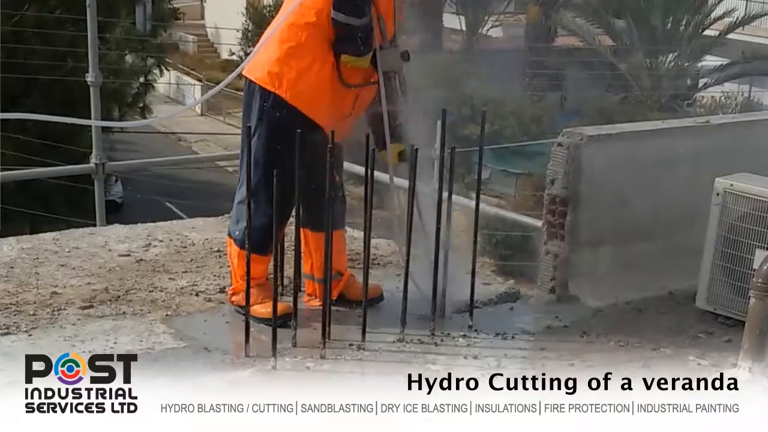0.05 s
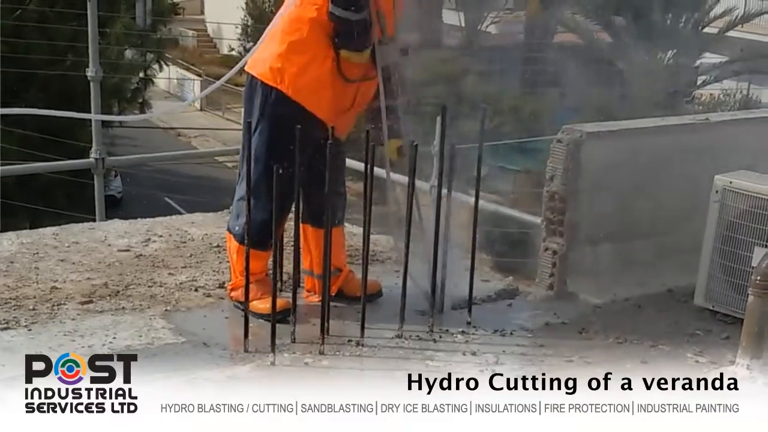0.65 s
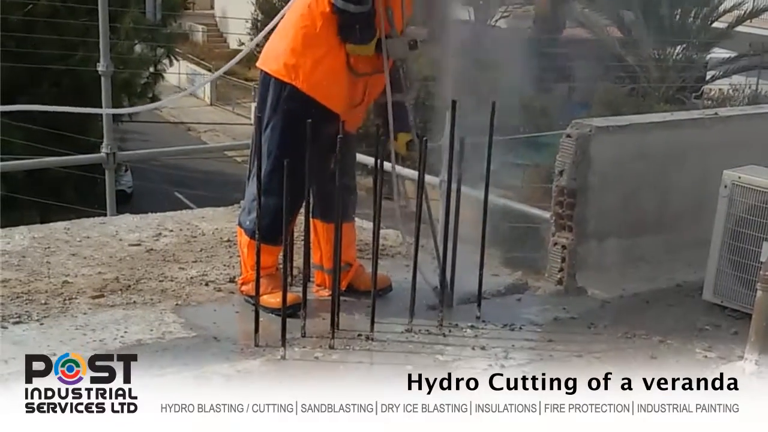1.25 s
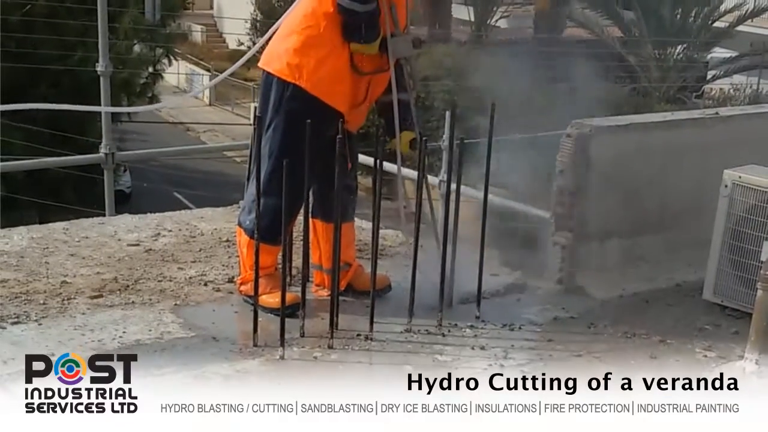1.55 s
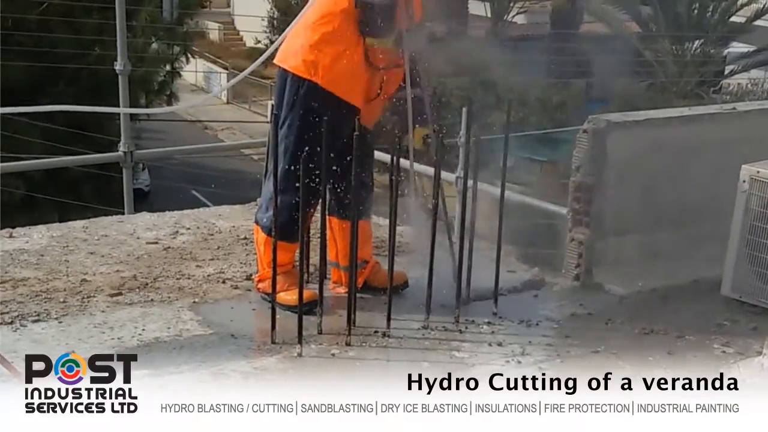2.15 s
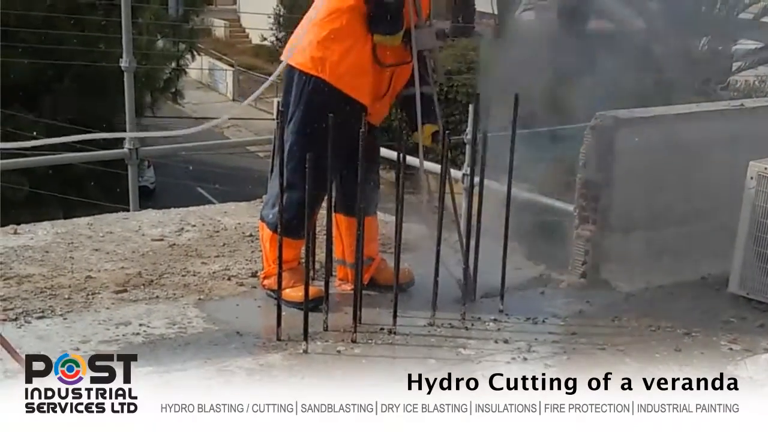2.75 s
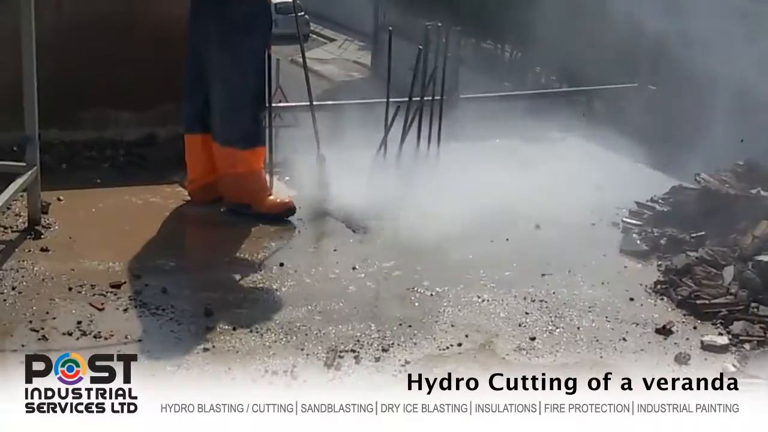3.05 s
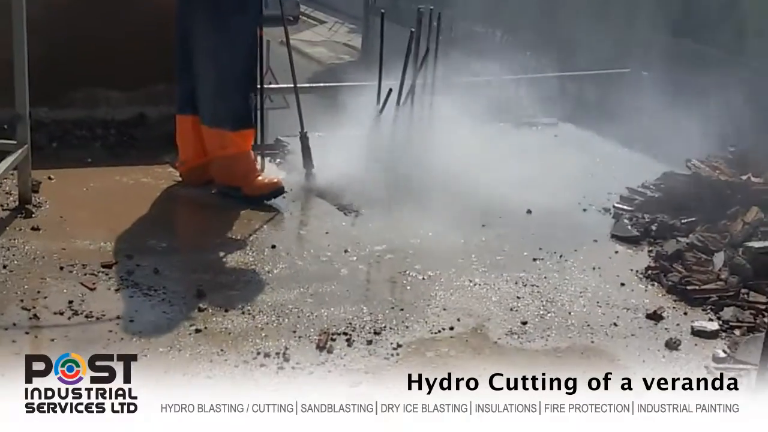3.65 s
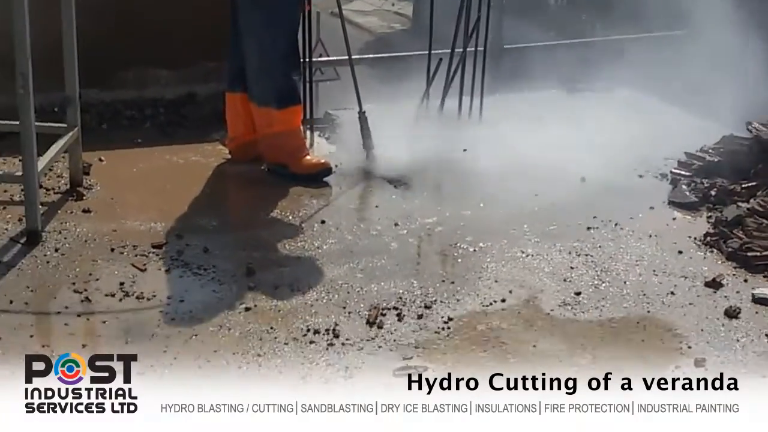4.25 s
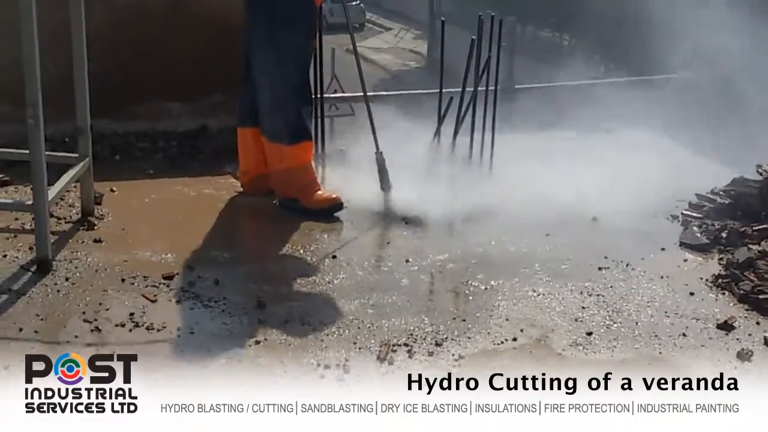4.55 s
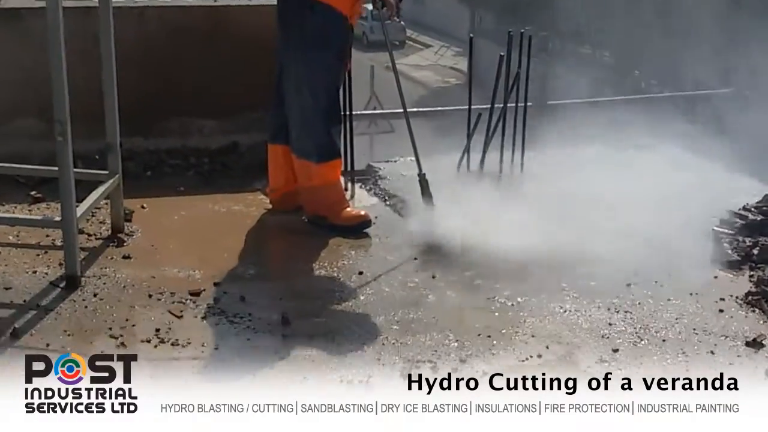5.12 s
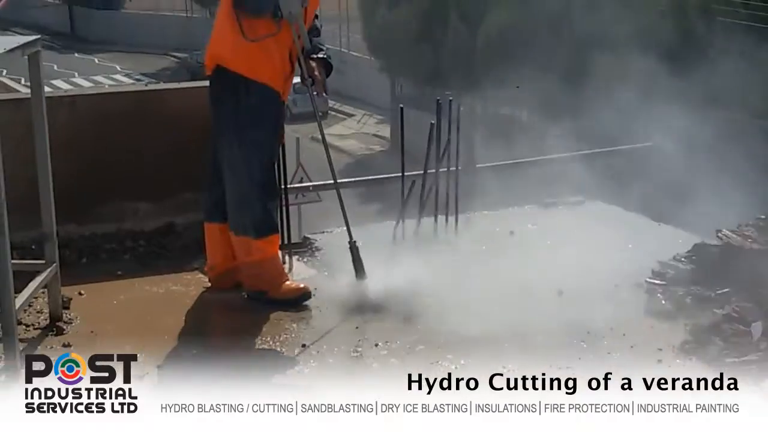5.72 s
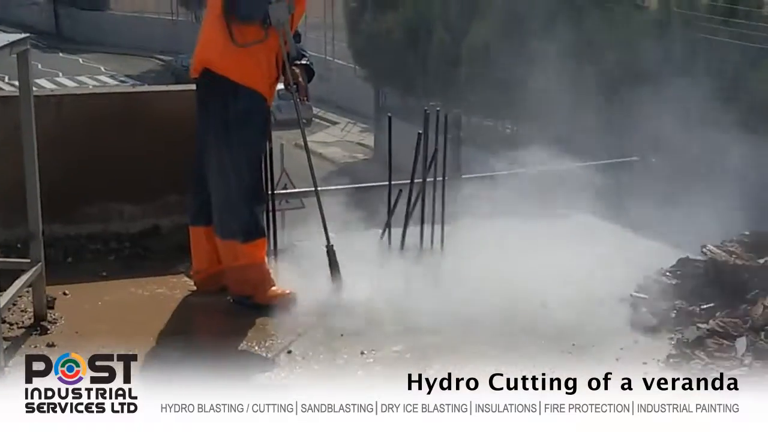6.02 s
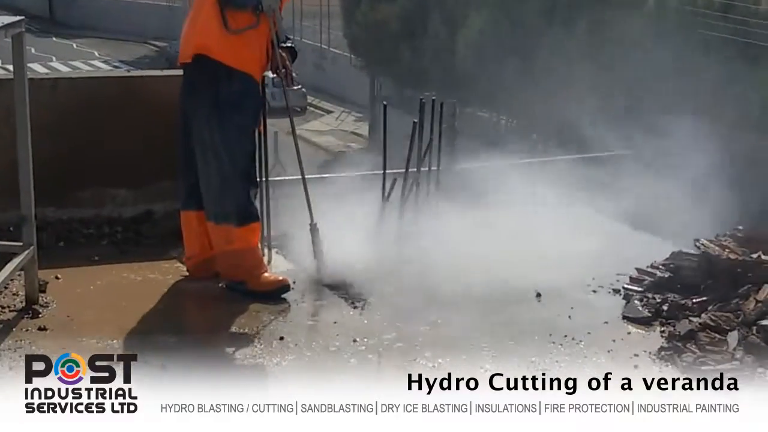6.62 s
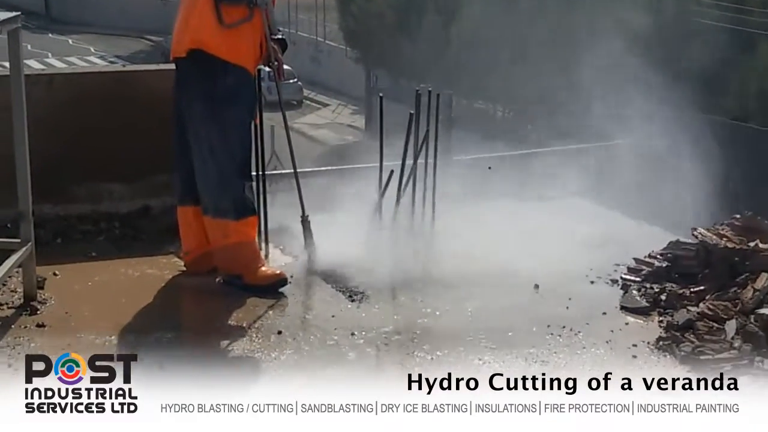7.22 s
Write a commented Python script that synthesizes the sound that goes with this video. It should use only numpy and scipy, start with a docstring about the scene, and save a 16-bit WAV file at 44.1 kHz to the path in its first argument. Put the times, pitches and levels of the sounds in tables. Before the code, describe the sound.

From the start, a high-pressure water jet cuts into concrete outdoors, a howling, rasping roar that surges in quick, irregular bursts. Bright flashes of spray and sharp spits of chips break through until about 2.6 seconds, and a steel bar rings faintly in the spray. A distant pump engine hums underneath, while light wind gives the microphone a few soft, low thumps. The jet eases a little near 2.7 seconds, picks up again, and everything stops dead at about 3.3 seconds. After a short silence, the jet fades in from 3.6 seconds, reaching full strength around 4. It now sweeps a flat slab with an even, tearing hiss, its colour shifting with close echoes. From about 5 seconds it grows slightly fuller, with a soft low rush and a fluttering hollow tone swelling now and then beneath it. The hiss continues to the end, near 7.4 seconds.

```python
"""An open roof terrace, where a high-pressure water lance is cutting concrete. First the jet digs at the foot
of a wall: its drops howl in the hole, roar in bursts as it bites, spit chips and set a steel bar singing. A
pump engine runs far off; light wind buffets the microphone. Then the scene changes: after a short silence the
jet fades in, sweeping the flat slab with an even, tearing hiss, coloured by near echoes off slab and wall, with
a hollow note swelling underneath."""
import sys
import numpy as np
from scipy import signal
from scipy.fft import rfft, irfft, next_fast_len
from scipy.io import wavfile
from scipy.ndimage import uniform_filter1d, map_coordinates

SR = 44100
rng = np.random.default_rng(int(sys.argv[2]) if len(sys.argv) > 2 else 0)


def file_out(sig):
    """Save sig as 16-bit WAV at sys.argv[1]."""
    # one column per channel
    cols = np.atleast_2d(sig).T
    # limit, then scale
    lim = np.clip(cols, -1, 1)
    pcm = np.round(lim * 32767).astype(np.int16)
    wavfile.write(sys.argv[1], SR, pcm)


N = 325458


# the jet between bursts, before trims and lifts: (time [s], body, howl, rasp, sizzle, spray [dB])
DIG_LEVELS = [(0, -44, -45.5, -37, -42.5, -45), (.35, -41.5, -38.5, -37, -48.5, -50),
              (.52, -43, -40.5, -36.5, -46, -53.5), (.68, -41, -41, -38, -46.5, -50),
              (.9, -46, -43, -32, -39.5, -45.5), (1.04, -43.5, -37.5, -37, -47, -57.5),
              (1.3, -42, -33, -36, -40.5, -52), (1.53, -41.5, -35, -38, -47, -51),
              (1.74, -41, -34.5, -36, -47, -48.5), (1.87, -40.5, -35, -36, -52, -50.5),
              (2.05, -43, -32.5, -31, -48.5, -48.5), (2.28, -44, -39.5, -40.5, -42, -47),
              (2.48, -44, -42, -37.5, -47.5, -48), (2.62, -44, -41, -38.5, -45, -45),
              (2.72, -46.5, -45.5, -44.5, -51, -54), (3.05, -45.5, -41.5, -43, -51, -51.5),
              (3.26, -43, -38, -37.5, -51.5, -49.5)]
# the jet at the foot of the wall: (frequency [Hz], relative level [dB])
DIG_SPECTRUM = [(210, -47), (350, -24), (449, -9.5), (541, -7.5), (663, -11.5), (717, -8.5), (1040, -4),
                (1360, 2), (1590, -7.5), (2040, -1), (2570, -0.5), (3860, 0), (7540, -23.5), (11800, -30.5),
                (14500, -40.5)]
# resonances of the cut: (centre [Hz], width [Hz], lift [dB])
CUT_RESONANCES = [(656, 49, 10), (720, 45, -3.5), (1045, 47, 8.5), (1262, 50, 4), (1327, 85, -8.5),
                  (1500, 51, 4), (1648, 117, 9.5), (1880, 45, 3), (2410, 76, 4), (2910, 110, 5.5),
                  (3240, 65, 2), (3600, 120, 0), (4350, 120, 2), (4950, 220, -1), (6100, 980, 5),
                  (7930, 1200, -3.5)]

def digging():
    """The jet howls in the hole it cuts, and hisses brightly when it glances off an edge."""
    body_db, howl_db, rasp_db, sizzle_db, spray_db = curves(DIG_LEVELS)
    roar_lift, rasp_lift = bites()
    glance_db = glances()
    jet = colour(impacts(rate=7000, spread_db=6.5, mist=0.73), DIG_SPECTRUM, CUT_RESONANCES)
    jet = pit_colour(cut_echoes(jet), depth_db=2.9, frames=26)
    body, howl, rasp, sizzle, spray = registers(jet, edges_hz=(1300, 2000, 4600, 7200))
    roar = body * amp(body_db + 0.5) + howl * amp(howl_db)
    # glancing out of the hole, the jet howls less and rasps more
    roar *= amp(roar_lift - 0.31 * glance_db) * sputter(slow_db=0.5, fast_db=1.0)
    rasp *= amp(rasp_db - 1 + rasp_lift + 0.33 * glance_db) * sputter(slow_db=1.0, fast_db=0.8)
    grind = (roar + rasp) * sputter(slow_db=0.46, fast_db=0.1)
    hiss = sizzle * amp(sizzle_db - 1.5 + 1.26 * glance_db) + spray * amp(spray_db + 2 + glance_db)
    return grind + hiss * sputter(slow_db=1.5, fast_db=1.0)


# the jet bites into the concrete: (time [s], length [s], roar lift [dB], rasp lift [dB])
JET_BITES = [(.008, 0.0087, 4, 2), (0.104, 0.02, 4.5, 7), (0.184, 0.014, 0, 9), (0.228, 0.048, 4, 2.5),
             (0.323, 0.066, 3.5, 0.5), (0.422, .007, 8, 4), (0.485, 0.015, 9, 6.5), (0.541, 0.01, 6.5, 1),
             (0.58, .012, -3, 1), (0.738, 0.017, 7.5, -0.5), (0.772, 0.073, 7.5, 3.5),
             (0.964, 0.033, 6.5, 3.5), (1.054, 0.024, 4, 2), (1.269, 0.037, 4.5, 1), (1.348, 0.042, 4.5, 4),
             (1.583, 0.062, 4.5, 4), (1.716, 0.028, -0.5, 3.5), (1.786, 0.014, 6, 4), (1.846, .012, 2.5, 2),
             (1.873, .012, 1.5, 2.5), (1.93, 0.026, 4, 2.5), (2.158, 0.03, 3.5, 2),
             (2.234, 0.049, 4.5, 5.5), (2.311, 0.068, 4.5, 6.5), (2.435, 0.025, 3.5, 5),
             (2.518, 0.027, 2, 0), (2.572, 0.045, 8, 6), (2.644, 0.018, 3, 7), (3.093, 0.01, 2, -0.5),
             (3.208, 0.054, 1.5, -1)]
# the jet slips into a gap: (time [s], length [s])
JET_SLIPS = [(0.376, 0.045), (.468, .012), (1.005, 0.035), (1.673, .032), (1.796, 0.04), (2.178, 0.044),
             (2.295, .012), (2.408, 0.025), (2.486, .014)]

def bites():
    """Lifts of roar and rasp in dB: the jet catches abruptly and settles, or sags in a gap."""
    starts, lengths, *lifts_db = np.transpose(JET_BITES)
    sag_db = gates([(s, length, -3.5) for s, length in JET_SLIPS], attack=0.031, release=0.0056)
    return [sag_db + gates(zip(starts, lengths, db), attack=0.0033, release=0.016) for db in lifts_db]


# the jet glances off an edge: (time [s], length [s], spray lift [dB])
JET_GLANCES = [(0, 0.016, -0.5), (0.046, 0.024, 4.5), (0.428, 0.044, 9), (0.503, 0.035, 8),
               (0.56, 0.12, 5.5), (0.747, 0.069, 6), (1.622, 0.051, 8.5), (1.681, 0.033, 5.5),
               (1.722, .06, 7.5), (2.177, 0.021, 6.5), (2.239, 0.031, 4.5), (2.317, 0.15, 4.5),
               (2.521, 0.043, 7)]
GLANCE_ATTACK_S, GLANCE_RELEASE_S = 0.0028, 0.018

def glances():
    """Lift of the spray in dB as an edge deflects the jet."""
    return gates(JET_GLANCES, GLANCE_ATTACK_S, GLANCE_RELEASE_S)


# close echoes in the cut and among the wall stubs: (delay [ms], signed share)
CORNER_ECHOES = [(1.12, .12), (1.28, .2), (1.61, -.12), (2.42, -.1), (3.17, .14), (3.45, .1), (3.57, -.12),
                 (3.68, .14), (5.32, .1)]
# change of colour on the rim of the cut: (centre [Hz], width [Hz], lift [dB])
RIM_RESONANCES = [(840, 164, 8.5), (1310, 72, -1), (1610, 300, -1), (2290, 140, 1.5), (3160, 110, -7.5),
                  (4000, 250, 2), (7000, 400, 1), (12420, 4000, 1.5)]

def cut_echoes(jet, rim_share=0.66, rim_delay_ms=(1.6, 6.5), rim_paths=7):
    """The corner's echoes colour the jet; each glance hits a fresh spot on the rim, with its own."""
    echo = dull(jet, edge_hz=6950)
    echoes = lambda paths: sum(share * np.roll(echo, round(ms * SR / 1000)) for ms, share in paths)
    sound = jet + echoes(CORNER_ECHOES)
    rim = unit(filtered(jet, lambda hz: amp(lifts(RIM_RESONANCES, hz))))
    for s, length, _ in JET_GLANCES:
        delays_ms = rng.uniform(*rim_delay_ms, rim_paths)
        shares = 0.22 * np.sign(rng.standard_normal(rim_paths))
        spot = rim + echoes(zip(delays_ms, shares))
        sound += gates([(s, length, rim_share)], GLANCE_ATTACK_S, GLANCE_RELEASE_S) * (spot - sound)
    return sound


# chips of concrete burst off: (time [s], level [dB])
CHIP_SPITS = [(.011, -24.5), (.055, -27), (.111, -29), (.426, -24.5), (.497, -27), (.549, -31), (.744, -34),
              (.799, -30), (1.622, -26.5), (1.732, -30), (1.848, -39), (2.178, -28), (2.231, -35),
              (2.313, -28), (2.352, -27), (2.44, -26), (2.509, -27), (2.58, -30)]
# a chip's sharp spit: (frequency [Hz], relative level [dB])
SPIT_SPECTRUM = [(200, -34.5), (500, -10.5), (900, -3.5), (1700, 6), (3500, 2.5), (6000, -1.5), (8500, -17),
                 (14500, -19.5)]

def spits(attack=0.0013):
    """A chip breaks away: a burst of drops and grit that starts at once and dies quickly."""
    bursts = gates([(s, attack, amp(db)) for s, db in CHIP_SPITS], attack, release=0.0069)
    return bursts * colour(impacts(rate=6000, spread_db=7.5, mist=0.6), SPIT_SPECTRUM)


# the jet grazes a steel bar: (time [s], length [s], level [dB])
BAR_GRAZES = [(0, 0.46, -50), (.76, 0.46, -51), (1.12, 0.31, -44), (2.25, 0.32, -47)]
# modes of the bar: (centre [Hz], width [Hz], relative level [dB])
BAR_MODES = [(2640, 50, -0.5), (3200, 35, -4.5), (3490, 35, -8), (3800, 45, -7.5)]

def rebar(idle_db=-54):
    """A steel bar sings faintly in the spray, and louder when the jet grazes it."""
    grazing = gates([(s, length, amp(db)) for s, length, db in BAR_GRAZES], attack=0.029, release=0.066)
    return (amp(idle_db) + grazing) * sum(amp(db) * narrow(hz, width) for hz, width, db in BAR_MODES)


# the jet out on the slab, before trims: (time [s], roar [dB], rasp [dB], spray [dB])
SWEEP_LEVELS = [(4.0, -42.5, -32.7, -33.3), (4.07, -41, -33, -31.5), (4.21, -40, -33.5, -32.5),
                (4.66, -39.5, -34, -33), (4.85, -37.7, -35.5, -36), (4.9, -35.5, -32.5, -34.5),
                (5.45, -37.5, -34.5, -36), (6.25, -37.5, -34, -36.5), (6.45, -35.5, -31, -34.5),
                (6.55, -37.5, -34.5, -35.5), (7.02, -39, -33.5, -37), (7.24, -42.5, -35.5, -35.5),
                (7.37, -36.5, -34.5, -36.5)]
# near echoes that shift with the lance: (time [s], slab delay [ms], wall delay [ms], wall share)
ECHO_PATHS = [(3.6, 1.15, 5.2, .35), (3.95, 1.15, 4.7, 0.5), (4.3, 1.17, 4.7, 0.5), (4.5, 1.14, 4.75, 0.4),
              (4.8, 1.21, 4.7, 0.5), (5.15, 1.25, 4.53, 0.24), (5.58, 1.31, 4.7, 0.3),
              (5.75, 1.6, 5.1, 0.55), (5.92, 1.37, 4.85, 0.13), (6.5, 1.26, 4.64, 0.33),
              (6.75, 1.31, 5, 0.45), (7.38, 1.23, 4.8, 0.28)]
# the jet before and after the lance swings round: (frequency [Hz], relative level [dB])
SLAB_SPECTRUM = [(320, -48.5), (550, -17), (807, 0.5), (900, -7), (1220, 2), (1410, -8), (1740, 2),
                 (2130, -10), (2380, -5), (2660, -10.5), (4410, -4), (12300, -15), (14500, -20.5)]
SWUNG_SPECTRUM = [(320, -37), (550, -8), (614, -4.5), (829, -0.5), (1340, -6.5), (1520, 1.5), (1740, 0.5),
                  (1970, -8.5), (2170, -2), (2370, -2.5), (2570, -11.5), (3170, -4), (5490, -4),
                  (12000, -11.5), (13800, -16.5), (14500, -25)]
# resonances of the jet on the slab: (centre [Hz], width [Hz], lift [dB])
SLAB_RESONANCES = [(970, 92, 2), (1740, 340, 2.5), (3225, 64, 1), (4300, 490, -2)]
# the jet catches on the slab, or briefly loses its grip: (time [s], length [s], lift [dB])
SLAB_CATCHES = [(3.72, .075, -0.5), (4.045, .035, -1.5), (4.118, .018, -2.5), (4.14, 0.029, 0.5),
                (4.88, .02, 1), (6.045, 0.017, 1.5), (6.19, .02, 0), (6.254, 0.024, 1.5),
                (6.357, 0.028, 0.5), (6.426, .012, 0), (6.572, .02, -1.5), (6.8, .025, 0.5),
                (7.11, 0.075, 0)]
NOTE_HZ = 204  # lowest partial of the hollow note

def sweeping():
    """On the flat slab the jet tears evenly; echoes off slab and wall comb its hiss."""
    roar_db, rasp_db, spray_db = curves(SWEEP_LEVELS)
    slab_ms, wall_ms, wall_share = curves(ECHO_PATHS)
    drops = impacts(rate=7000, spread_db=7.0, mist=0.69)
    swung = np.clip((slab_ms - 1.14) / 0.12, 0, 1)  # the slab echo lengthens as the lance swings
    jet = (1 - swung) * colour(drops, SLAB_SPECTRUM, SLAB_RESONANCES)
    jet += swung * colour(drops, SWUNG_SPECTRUM, SLAB_RESONANCES)
    jet += 0.11 * delayed(dull(jet, edge_hz=11000), slab_ms)
    jet += wall_share * delayed(dull(jet, edge_hz=2900), wall_ms)
    jet = pit_colour(jet, depth_db=2.3, frames=24)
    roar, rasp, spray = registers(jet, edges_hz=(2000, 5000))
    roar *= amp(roar_db) * sputter(slow_db=0.5, fast_db=1.5)
    rasp *= amp(rasp_db - 0.3) * sputter(slow_db=0, fast_db=0.76)
    spray = (spray + sheen()) * amp(spray_db - 1.33)
    rush = mist_rush(wall_ms, wall_share)
    buzz = 1 + 0.13 * np.sin(2 * np.pi * NOTE_HZ * clock() + wobble(32))
    hiss = (roar * buzz + rasp + spray + rush) * sputter(slow_db=0.54, fast_db=0.17)
    return (hiss + flares()) * amp(gates(SLAB_CATCHES, attack=0.0069, release=0.007))


# a band that sinks as the lance swings: (time [s], centre [Hz], level against the spray [dB])
SHEEN_GLIDE = [(3.6, 6250, -14), (4.35, 6310, -11), (4.6, 5800, -18), (4.85, 5760, -7.5), (5.2, 5570, -7),
               (5.55, 5410, -4), (6.2, 5500, -11), (6.6, 5400, -15.5), (7.38, 5520, -13)]

def sheen():
    """A thin band of the spray sings along a gliding pitch."""
    hz, db = curves(SHEEN_GLIDE)
    return amp(db) * narrow(hz, width_hz=380)


# brief rings in the hiss: (time [s], length [s], centre [Hz], level [dB])
HISS_FLARES = [(4.15, 0.22, 1827, -40), (4.88, 0.25, 3240, -41.5), (5.03, .2, 2210, -44),
               (6.24, .22, 1547, -43.5), (6.68, .2, 3200, -44)]

def flares():
    """A narrow band of the hiss rings up for a moment."""
    return sum(gates([(s, length, amp(db))], attack=0.025, release=0.025) * narrow(hz, width_hz=90)
               for s, length, hz, db in HISS_FLARES)


# dips in the mids: (time [s], length [s], centre [Hz], width [Hz], gain [dB])
MID_NOTCHES = [(.75, 0.072, 340, 200, -23), (0.791, .1, 190, 140, -4), (1.655, 0.092, 400, 190, -22),
               (2.168, 0.053, 390, 169.5, -15), (2.315, 0.07, 350, 240, -24), (2.43, 0.09, 440, 170, -16),
               (3.6, 0.66, 527, 90, -14), (4.124, 0.21, 320, 95, -19), (4.4, 0.29, 310, 100, -5),
               (5.723, 0.053, 432, 170, -15), (5.65, .2, 1310, 110, -11), (3.6, 0.38, 700, 130, -1),
               (3.6, .7, 2090, 130, -5), (4.45, .38, 2600, 150, -5), (4.42, 0.16, 507, 79.5, -8),
               (5.35, .13, 324, 90, -7), (5.6, 0.25, 1120, 100, -6), (5.66, 0.18, 500, 90, -8),
               (6.7, .2, 480, 70, -8), (6.68, .13, 290, 120, -15), (7.13, 0.058, 470, 130, -16)]

def hollowed(x, edge_s=0.015):
    """Brief notches take a band out of the mids as the lance moves."""
    hz, t, spectrum = signal.stft(x, SR, nperseg=2048, noverlap=1536)
    for s, length, centre, width, db in MID_NOTCHES:
        band = np.exp(-(2 * (hz - centre) / width) ** 2)
        inside = np.clip(np.minimum(t - s, s + length - t) / edge_s + 1, 0, 1)
        spectrum *= amp(db * np.outer(band, inside))
    return signal.istft(spectrum, SR, nperseg=2048, noverlap=1536)[1][:N]


# the low rush of the mist cloud: (time [s], level [dB])
MIST_LEVELS = [(3.8, -49.5), (4.3, -54), (4.5, -46.5), (4.8, -47), (4.92, -44), (5.6, -43), (6.45, -41),
               (6.68, -50), (7.0, -45.5), (7.38, -48.5)]
# its colour: (frequency [Hz], relative level [dB])
MIST_SPECTRUM = [(20, -34), (75, -28), (105, -22), (145, -9), (250, 0), (330, -3), (390, -0.5), (500, -3),
                 (610, 3), (820, -1.5), (1100, -6), (2500, -45)]
# its resonances: (centre [Hz], width [Hz], lift [dB])
MIST_RESONANCES = [(196, 44, 5), (612, 36, 4), (814, 50, 4)]

def mist_rush(wall_ms, wall_share):
    """The mist's low rush reaches the microphone directly and off the wall, which combs it."""
    level_db, = curves(MIST_LEVELS)
    rush = colour(rng.standard_normal(N), MIST_SPECTRUM, MIST_RESONANCES)
    return unit(rush + 0.55 * wall_share * delayed(rush, wall_ms)) * amp(level_db)


# partials of the hollow note under the sweep: (frequency [Hz], relative level [dB])
NOTE_PARTIALS = [(204, 4.5), (420, -3.5), (815, 0), (1000, -0.5), (1225, -5.5)]
# the note swells: (time [s], length [s], lift [dB])
NOTE_SWELLS = [(3.865, 0.2, 2), (4.21, 0.05, 6), (4.93, .2, 5), (5.19, 0.32, 7.5), (5.55, 0.28, 2.5),
               (5.95, 0.088, 8.5), (6.11, 0.16, 8.5), (6.74, 0.17, 10), (7.01, 0.059, 9), (7.24, 0.09, 8.5)]

def hollow_note(level_db=-52.5, flutter_db=8):
    """A fluttering note whose partials each waver quickly in pitch, the higher ones more."""
    swell_db = gates(NOTE_SWELLS, attack=0.016, release=0.038)
    waver = lambda hz: 1.13 * np.sqrt(hz / NOTE_HZ) * wobble(32)
    note = sum(amp(db) * np.sin(2 * np.pi * hz * clock() + waver(hz)) for hz, db in NOTE_PARTIALS)
    return amp(level_db + swell_db) * unit(note * amp(flutter_db * np.tanh(wobble(50))))


# single partials ring clear: (time [s], length [s], frequency [Hz], level [dB])
CLEAR_PARTIALS = [(3.87, 0.16, 204.6, -41.5), (3.898, 0.14, 409, -49), (3.905, .085, 1222, -41),
                  (3.96, 0.056, 829, -43), (4.119, 0.12, 420, -54), (5.338, .09, 790, -44),
                  (5.49, 0.1, 603, -41), (5.504, .17, 815, -43), (5.666, 0.208, 204.6, -43.5),
                  (5.68, 0.058, 1015, -40), (5.688, 0.14, 1225, -44), (5.698, .07, 604, -42),
                  (5.828, .045, 1000, -42), (6.77, 0.055, 990, -41)]

def clear_tones(flutter_db=2.5):
    """Now and then a partial of the hollow note steadies and stands clear of the hiss."""
    tone = lambda hz: np.sin(2 * np.pi * hz * clock() + 0.35 * wobble(22))
    tones = sum(gates([(s, length, amp(db))], attack=0.013, release=0.014) * tone(hz)
                for s, length, hz, db in CLEAR_PARTIALS)
    return tones * amp(flutter_db * np.tanh(wobble(40)))


# low puffs under the sweep: (time [s], peak before the trim [dB])
LOW_PUFFS = [(5.218, -58), (5.915, -54), (6.169, -55), (6.329, -50), (6.75, -53), (7.029, -58),
             (7.218, -52)]

def puffs(trim_db=-3, rise_s=0.02):
    """Short, soft bumps of low noise."""
    bumps = sum(amp(db + trim_db) * np.exp(-((clock() - s - rise_s) / rise_s) ** 2)
                for s, db in LOW_PUFFS)
    spectrum = [(40, -35), (90, -18), (130, -6), (165, -4), (260, -28), (600, -80)]  # (Hz, dB)
    return bumps * colour(rng.standard_normal(N), spectrum)


# machine noise around the pump, far from the microphone: (frequency [Hz], relative level [dB])
MACHINE_SPECTRUM = [(30, -37), (100, -19.5), (220, -5), (330, 0), (450, -7.5), (900, -2), (4000, -25.5)]

def pump(firing_hz=60.6, note_db=-56, wash_db=-51):
    """The distant pump engine: a slightly unsteady firing note in a dull wash of machine noise."""
    phase = 2 * np.pi * firing_hz * clock() + 0.25 * wobble(6)
    wash = colour(rng.standard_normal(N), MACHINE_SPECTRUM)
    return amp(note_db) * np.sin(phase) + amp(wash_db) * wash


# wind right on the microphone: (frequency [Hz], relative level [dB])
WIND_SPECTRUM = [(15, -28.5), (30, -13.5), (55, -3), (85, -3.5), (130, -4.5), (200, -12), (400, -30.5),
                 (1000, -77.5)]
# gusts across the terrace: (time [s], length [s], lift [dB])
WIND_GUSTS = [(0, 0.081, 15), (.2, 0.21, 7.5), (.45, 0.33, 4.5), (1.09, .1, 4), (2.85, 0.14, 5.5),
              (3.11, 0.26, 4.5)]

def wind(breeze_db=-56):
    """Light gusts buffet the microphone."""
    level_db = breeze_db + gates(WIND_GUSTS, attack=0.029, release=0.058) + wobble(8.9)
    return amp(level_db) * colour(rng.standard_normal(N), WIND_SPECTRUM)


# eddies at the microphone: (time [s], frequency [Hz], envelope peak [dB])
EDDY_THUMPS = [(.03, 85, -38), (.068, 140, -42), (.218, 90, -38), (1.108, 135, -40), (1.137, 110, -44),
               (2.555, 90, -36), (2.91, 85, -42), (2.938, 115, -42), (2.973, 110, -38)]

def thumps(rise_s=0.005):
    """An eddy hits the microphone: one low push that swells and is gone within a few cycles."""
    total = np.zeros(N)
    for s, hz, db in EDDY_THUMPS:
        age = np.maximum(clock() - s, 0)
        total += amp(db) * age / rise_s * np.exp(1 - age / rise_s) * np.sin(2 * np.pi * hz * age)
    return total


def impacts(rate, spread_db, mist):
    """Drops of random size strike the concrete, rate a second, in a share of smooth mist."""
    hit = rng.random(N) < rate / SR
    size = amp(spread_db * rng.uniform(-0.91, 1, N))
    drops = unit(hit * np.sign(rng.standard_normal(N)) * size)
    return unit(drops + mist * rng.standard_normal(N))


def sputter(slow_db, fast_db):
    """The jet breaks into slugs, so its force flutters, within bounds."""
    return amp(slow_db * 2 * np.tanh(wobble(55) / 2) + fast_db * 2 * np.tanh(wobble(280) / 2))


def pit_colour(x, depth_db, frames):
    """The changing pit under the jet gives the treble drifting patches of colour."""
    hz, _, spectrum = signal.stft(x, SR, nperseg=1024)
    patches = uniform_filter1d(rng.standard_normal(spectrum.shape), size=3, axis=0)
    patches = unit(uniform_filter1d(patches, size=frames, axis=1))
    treble = np.interp(hz, [1000, 3500, 8000], [0.35, 0.8, 1])[:, None]
    return signal.istft(spectrum * amp(depth_db * treble * patches), nperseg=1024)[1][:N]


def dull(x, edge_hz):
    """Rough wet surfaces scatter the treble, so their echoes are duller."""
    return filtered(x, lambda hz: 1 / np.hypot(1, (hz / edge_hz) ** 2))


def delayed(x, ms):
    """x arriving ms later; the delay may move."""
    return map_coordinates(x, [np.arange(N) - ms * SR / 1000], order=2)


def registers(x, edges_hz):
    """Split x into bands, each of rms 1."""
    below = [filtered(x, lambda hz: 1 / (1 + (hz / edge) ** 12)) for edge in edges_hz]
    return [unit(band) for band in np.diff([np.zeros(N), *below, x], axis=0)]


def colour(x, spectrum, resonances=()):
    """Shape x by a spectrum and its resonances, at rms 1."""
    knots_hz, db = np.transpose(spectrum)
    slope_db = lambda hz: np.interp(np.log(hz + 1), np.log(knots_hz), db)
    return unit(filtered(x, lambda hz: amp(slope_db(hz) + lifts(resonances, hz))))


def lifts(resonances, hz):
    """Gain in dB of a set of resonances."""
    return sum(db / (1 + (2 * (hz - centre) / width) ** 2) for centre, width, db in resonances)


def filtered(x, response):
    """x through a gain that depends on frequency."""
    size = next_fast_len(N + SR // 4)
    return irfft(rfft(x, size) * response(np.fft.rfftfreq(size, 1 / SR)), size)[:N]


def narrow(hz, width_hz):
    """Narrow noise of rms 1 around a pitch, which may glide."""
    phase = 2 * np.pi * np.cumsum(hz + np.zeros(N)) / SR
    return unit(wobble(width_hz) * np.sin(phase) + wobble(width_hz) * np.cos(phase))


def gates(rows, attack, release):
    """Summed envelopes for rows of (start, length, height): rise, hold, decay; times in seconds."""
    t, total = clock(), np.zeros(N)
    for s, length, height in rows:
        span = slice(*np.searchsorted(t, [s, s + length + 10 * release]))
        age = t[span] - s
        decay = np.exp(-np.maximum(age - length, 0) / release)
        total[span] += height * np.clip(age / attack, 0, 1) * decay
    return total


def wobble(rate):
    """A smooth random curve, rate knots a second."""
    knots = rng.standard_normal(int(N * rate / SR) + 4)
    fine = np.arange(0, N * rate / SR + 1, 1 / 8)
    return np.interp(clock() * rate, fine, map_coordinates(knots, [fine]))


def curves(rows):
    """One value per sample for each column after the time."""
    times, *columns = np.transpose(rows)
    return [np.interp(clock(), times, column) for column in columns]


def clock():
    """The time of each sample."""
    return np.arange(N) / SR


def amp(db):
    """Decibels to gain."""
    return 10 ** (np.asarray(db) / 20)


def unit(x):
    """Scale to rms 1."""
    return x / np.sqrt(np.mean(x ** 2) + 1e-20)


DIG_END_S, SWEEP_START_S = 3.265, 3.592
FADE_IN_S, FADE_FROM_DB = 0.35, -32.5

def scene():
    """The scene changes: the digging at the wall, with pump and wind, ends abruptly; after a short silence the
    sweep on the slab fades in."""
    t = clock()
    at_wall = hollowed(digging() + rebar() + spits() + pump() + wind() + thumps())
    on_slab = hollowed(sweeping() + hollow_note() + clear_tones() + puffs())
    stop = np.exp(-np.maximum(t - DIG_END_S, 0) / 0.0021)
    rise = np.clip((t - SWEEP_START_S) / FADE_IN_S, 0, 1) ** 0.82
    fade_in = (t > SWEEP_START_S) * (rise + (1 - rise) * amp(FADE_FROM_DB))
    return (at_wall * stop + on_slab * fade_in)[None]


PEAK_LIMIT, HISS_DB, TOP_HZ = 0.16, -103.5, 14550

def record(dry):
    """One microphone: the recorder rounds off peaks, adds faint hiss and cuts the highest treble."""
    rounded = dry[0] / (1 + (dry[0] / PEAK_LIMIT) ** 6) ** (1 / 6)
    hiss = amp(HISS_DB) * rng.standard_normal(N)
    return filtered(rounded + hiss, lambda hz: 1 / (1 + (hz / TOP_HZ) ** 200))[None]


dry = scene()
out = record(dry)
file_out(out)
```